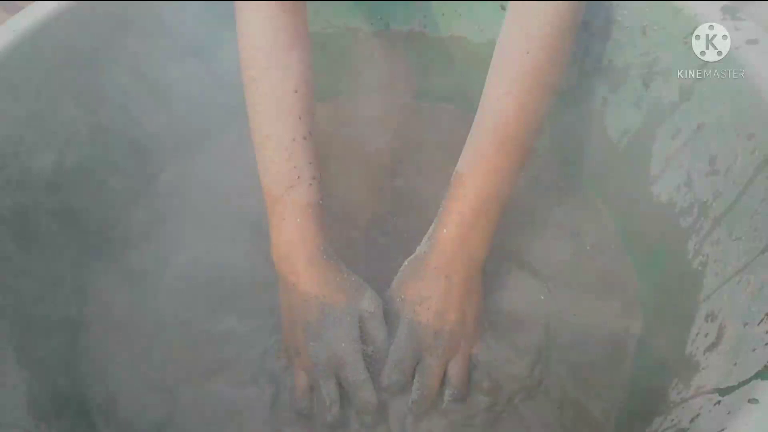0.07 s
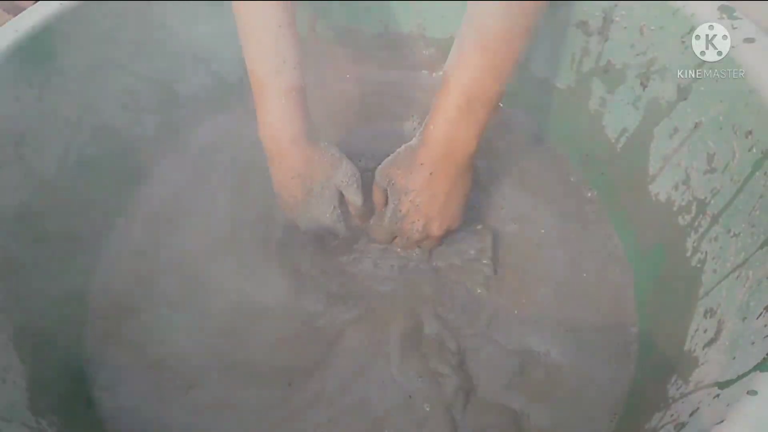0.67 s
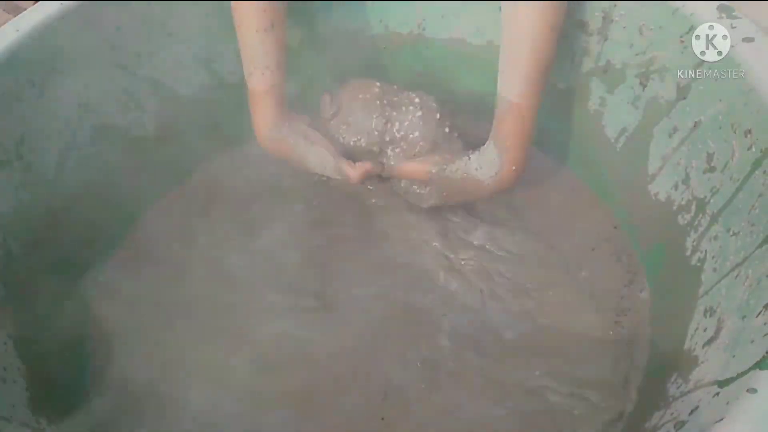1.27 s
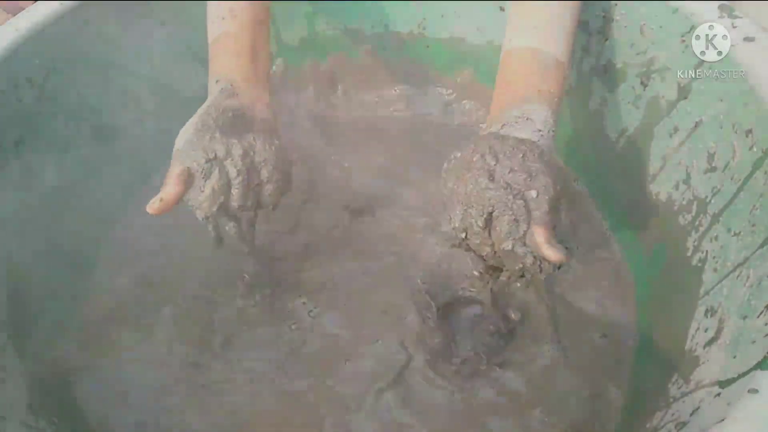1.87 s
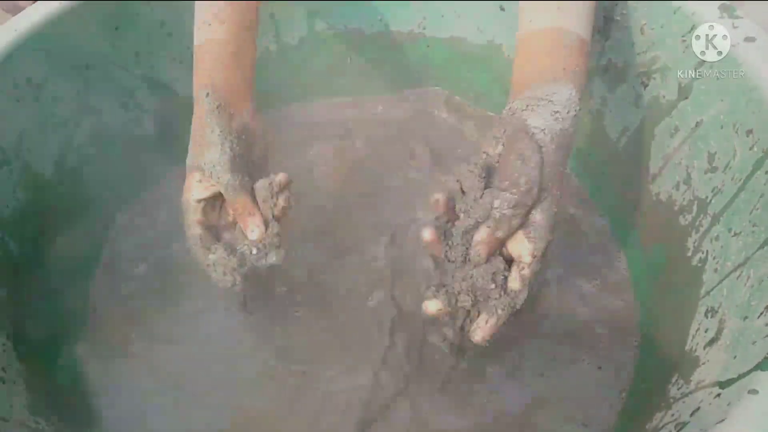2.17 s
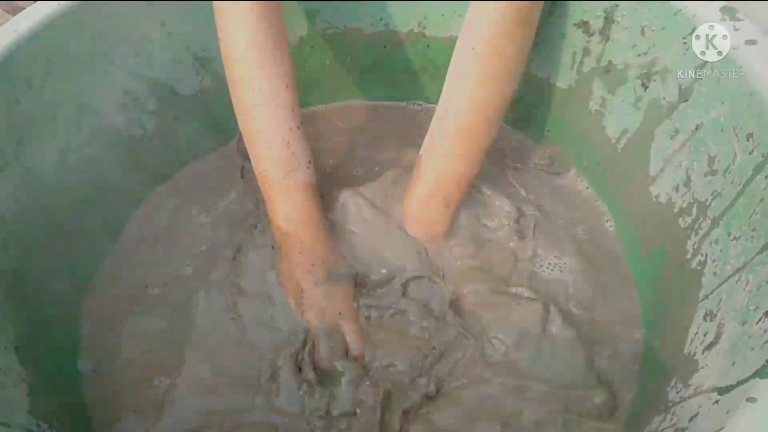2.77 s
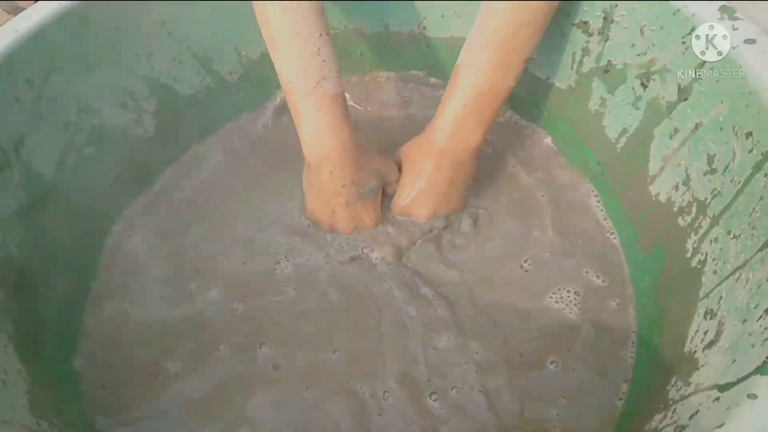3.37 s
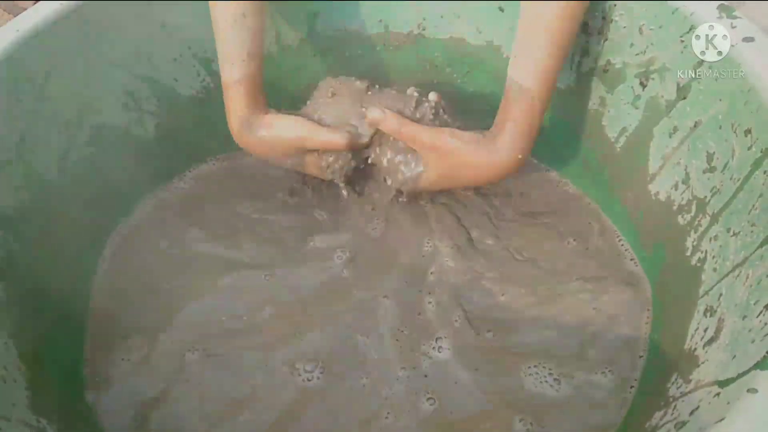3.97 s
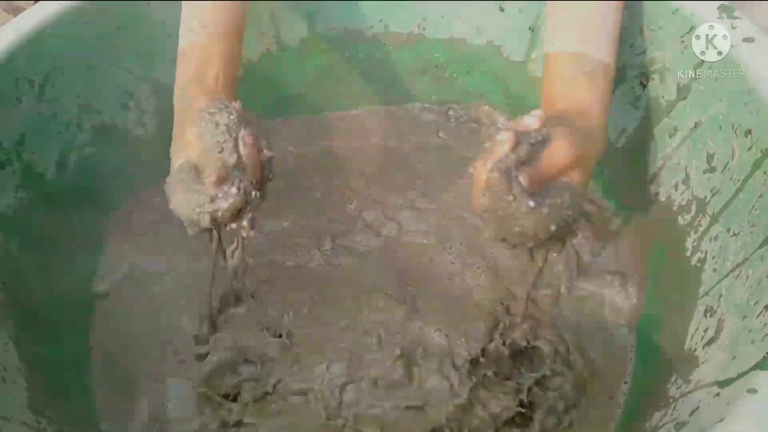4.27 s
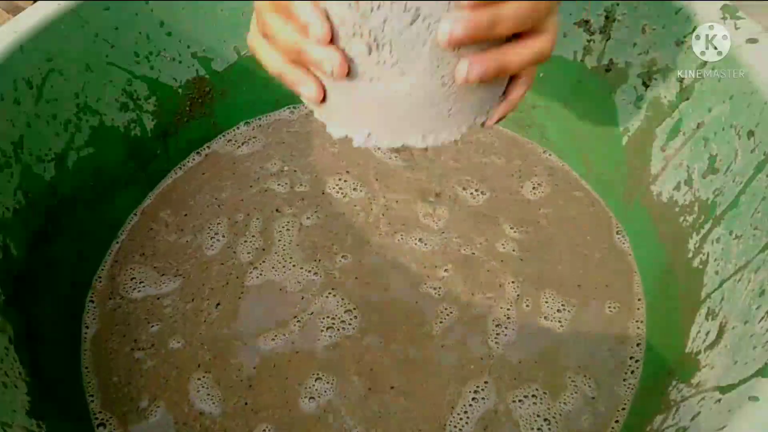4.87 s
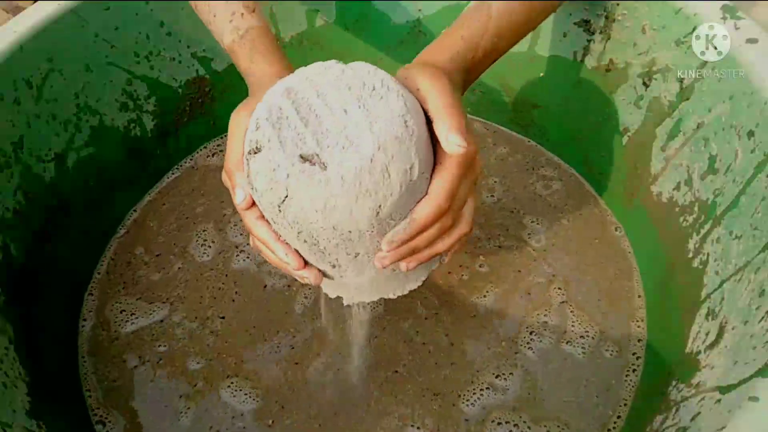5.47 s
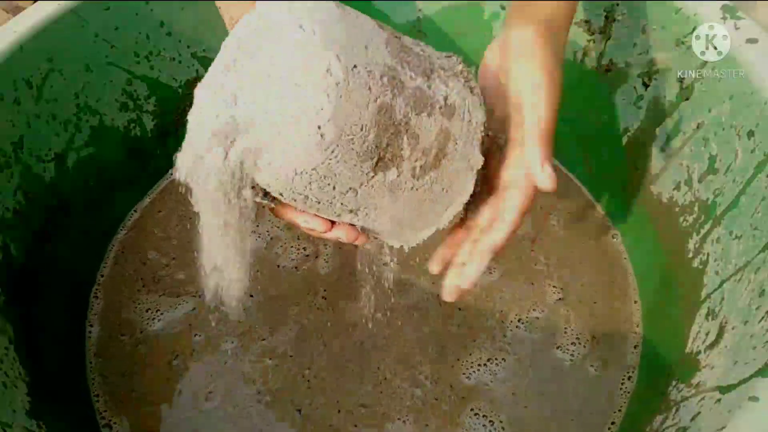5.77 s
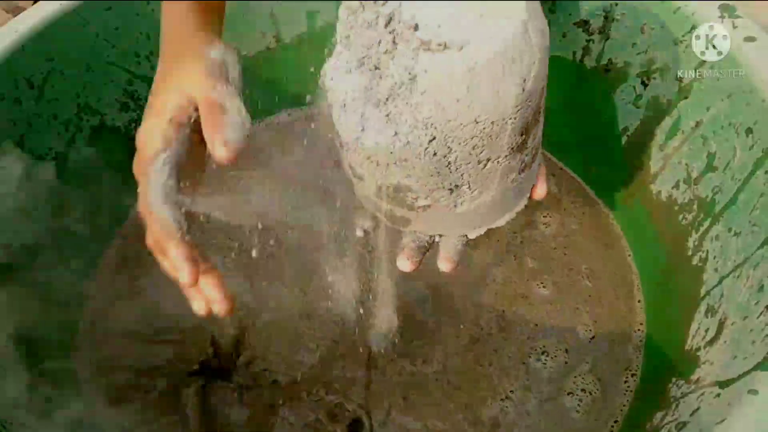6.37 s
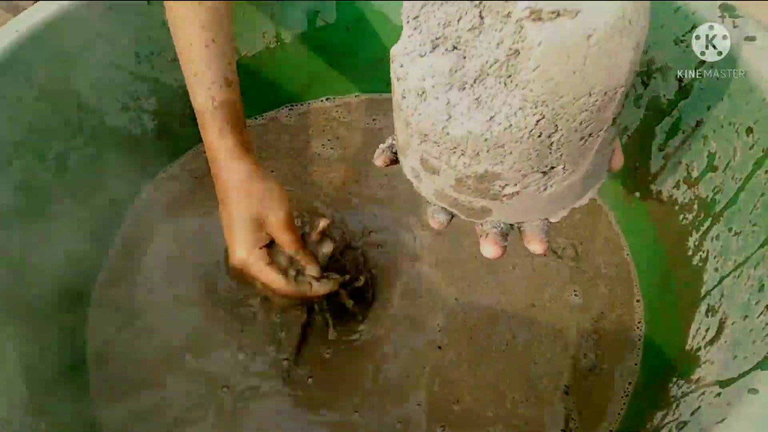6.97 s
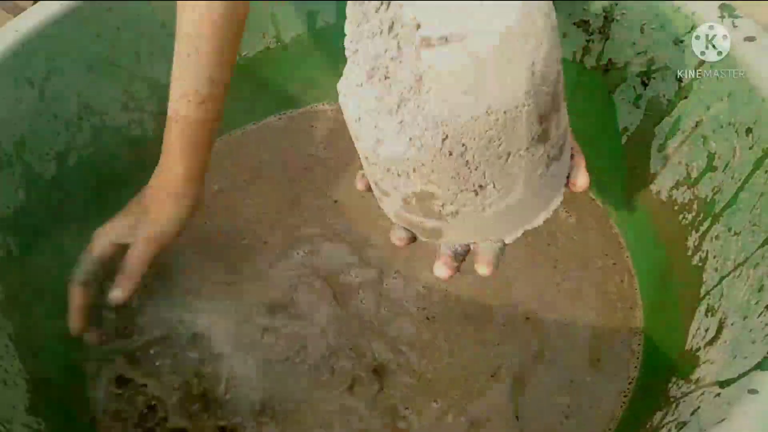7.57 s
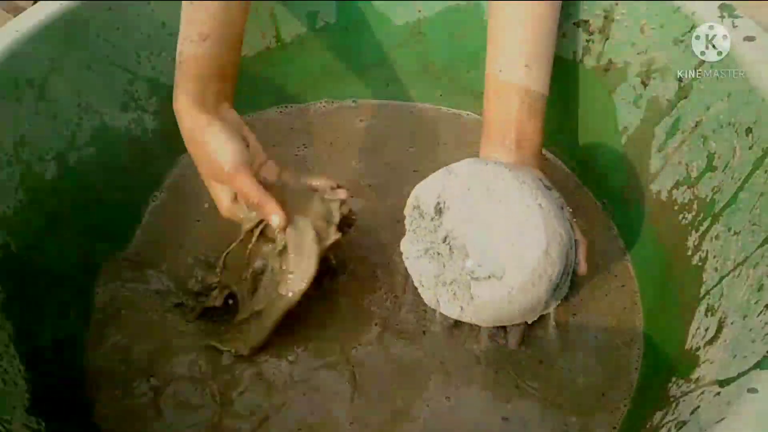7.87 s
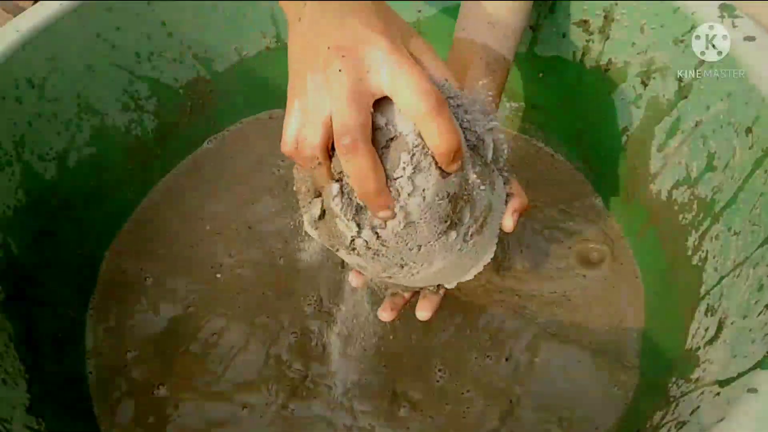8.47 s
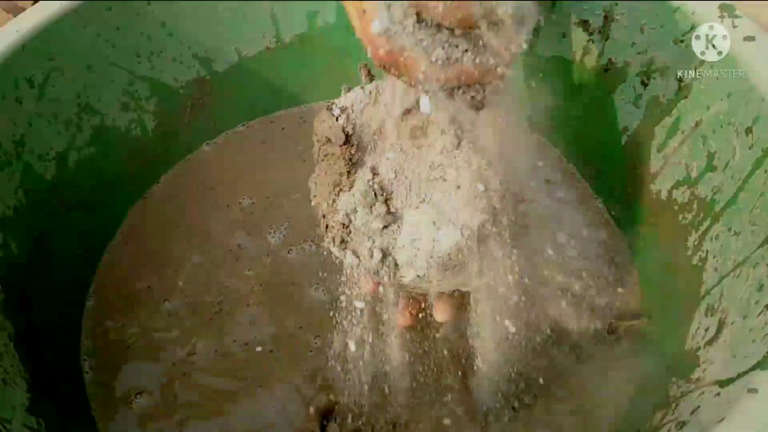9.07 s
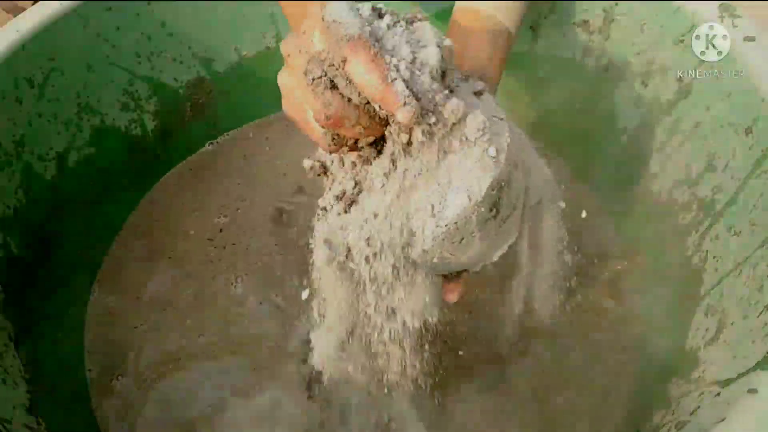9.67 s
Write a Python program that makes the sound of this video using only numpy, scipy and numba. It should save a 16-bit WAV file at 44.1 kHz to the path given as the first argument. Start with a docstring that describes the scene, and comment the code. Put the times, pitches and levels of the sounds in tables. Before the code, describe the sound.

Hands knead and scoop sandy mud in a plastic tub of water. The slurry swirls, fizzes and falls back in wet splats, with plops of trapped air. After a brief lull about halfway, dry sand hisses into the water, a hand splashes lightly, and a sand block is crushed, its grit pattering down. The tub booms softly at times. The microphone is close, with the bright detail mostly on the left.

```python
"""Mud and sand in a plastic tub

Two hands knead and scoop slurry: it swirls, spatters and fizzes with bubbles, falls back in
splats, and trapped air plops. Then a block of dry sand is wetted and crushed; its grit hisses
and patters into the water. Bubbles and grains are damped sines, mixed with shaped noise.
The tub booms softly at times; the close microphone hears the treble mostly on the left."""
import sys
import numpy as np
from scipy import signal
from scipy.fft import rfft, irfft, next_fast_len
from scipy.io import wavfile
from scipy.ndimage import map_coordinates
from numba import njit

SR = 44100
rng = np.random.default_rng(int(sys.argv[2]) if len(sys.argv) > 2 else 0)


def log_audio(samples):
    """Write samples as a 16-bit WAV file to the path given in sys.argv[1]."""
    # one column per channel
    frames = np.atleast_2d(samples).T
    # limit to full scale, then quantise
    limited = np.clip(frames, -1, 1)
    pcm = np.round(limited * 32767).astype(np.int16)
    wavfile.write(sys.argv[1], SR, pcm)


N = 428211


def amp(db):
    """Decibels to gain."""
    return 10 ** (np.asarray(db) / 20)


def unit(x):
    """Scale to rms 1."""
    return x / np.sqrt(np.mean(x ** 2) + 1e-20)


def along(points, hz):
    """Read (freq_hz, value) points on a log axis."""
    freq_hz, values = np.transpose(points)
    return np.interp(np.log(hz + 1), np.log(freq_hz + 1), values)


def stroke(at_s, rise_s, hold_s, fall_s, levels_db, growth_db_per_s=0, fade_db=28):
    """Rise, hold and fall as (time_s, level_db, ...) rows; the hold ends at levels_db."""
    last_db = np.array(levels_db)
    first_db = last_db - growth_db_per_s * hold_s
    return [(at_s - rise_s, *(first_db - fade_db)), (at_s, *first_db),
            (at_s + hold_s, *last_db), (at_s + hold_s + fall_s, *(last_db - fade_db))]


def gains(*curves):
    """Per-sample gain for each dB column; overlapping curves add in power."""
    t = np.arange(0, N / SR, .003)
    each = []
    for rows in curves:
        time_s, *columns_db = np.transpose(rows)
        each.append([amp(np.interp(t, time_s, db, left=-120, right=-120)) for db in columns_db])
    return [np.interp(np.arange(N) / SR, t, gain) for gain in np.linalg.norm(each, axis=0)]


def wobble(knots_per_s):
    """Smooth random curve."""
    knots = rng.standard_normal(int(N * knots_per_s / SR) + 4)
    return map_coordinates(knots, [np.arange(N) * knots_per_s / SR])


def spatter(per_s, fall_s, scatter_db):
    """Envelope of quick random swells, rms 1."""
    jitter, chance = rng.random((int(per_s * N / SR), 2)).T
    at = ((np.arange(len(jitter)) + 2 * jitter) / len(jitter) * N).astype(int) % N
    heights = amp(-scatter_db * np.log(np.maximum(chance, np.exp(-3))))
    poles = np.exp(-1 / (SR * np.array([fall_s, fall_s / 3])))
    return unit(signal.lfilter([1], np.poly(poles), np.bincount(at, heights, N)))


def filtered(x, response):
    """Apply a gain given as a function of Hz."""
    size = next_fast_len(N + SR // 4)
    return irfft(rfft(x, size) * response(np.fft.rfftfreq(size, 1 / SR)), size)[..., :N]


def coloured(x, spectrum):
    """Shape by (freq_hz, gain_db) points, rms 1."""
    return unit(filtered(x, lambda hz: amp(along(spectrum, hz))))


def noise(width):
    """White stereo noise; width is side over mid."""
    mid, side = rng.standard_normal((2, N))
    return unit(np.array([mid + width * side, mid - width * side]))


def swell(peak_s, db, hz, width_oct, rise_s, fall_s):
    """Noise band that grows until peak_s, then fades."""
    t = np.arange(SR) / SR - .5
    octaves = np.log2((np.fft.rfftfreq(SR, 1 / SR) + 1) / hz)
    response = (octaves > -3) / (1 + (octaves / width_oct) ** 2) ** 2
    band = unit(irfft(rfft(rng.standard_normal(SR)) * response, SR))
    envelope = np.exp(-(t / np.where(t < 0, rise_s, fall_s)) ** 2)
    return np.interp(np.arange(N) / SR, peak_s + t, amp(db) * band * envelope, left=0, right=0)


@njit
def ring(starts_s, size, hz, t60_s, rise, attack_cycles, n, sr):
    """Damped sines with a start for each ear; pitch climbs by the fraction rise over t60_s."""
    out = np.zeros((2, n))
    for ear in range(2):
        for g in range(len(size)):
            start_s = starts_s[ear, g]
            for i in range(max(0, int(start_s * sr) + 1), min(n, int((start_s + t60_s[g]) * sr))):
                t = i / sr - start_s
                cycles = hz[g] * t * (1 + rise * t / t60_s[g] / 2)
                onset = 1 - np.exp(-(cycles / attack_cycles) ** 2)
                decay = np.exp(-6.9 * t / t60_s[g])
                out[ear, i] += size[g] * decay * onset * np.sin(2 * np.pi * cycles)
    return out


def bubbles(start_s, size, hz, t60_s, rise, attack_cycles):
    """Ringing grains scattered over the tub, each reaching one ear slightly earlier."""
    start_s, size, hz, t60_s = map(np.ravel, (start_s, size, np.clip(hz, 60, SR / 3), t60_s))
    lag_s = .0001 * rng.standard_normal(len(start_s))
    starts_s = np.array([start_s - lag_s / 2, start_s + lag_s / 2])
    return ring(starts_s, size, hz, t60_s, float(rise), float(attack_cycles), N, SR)


def swarm(per_s, low_hz, high_hz, cycles, scatter_db, rise):
    """Steady stream of grains, many weak and a few strong, rms 1."""
    when, pitch, chance = rng.random((int(per_s * N / SR), 3)).T
    hz = low_hz + (high_hz - low_hz) * pitch
    size = amp(-scatter_db * np.log(np.maximum(chance, np.exp(-4)))) * np.sqrt(hz)
    return unit(bubbles(when * N / SR, size, hz, cycles / hz, rise, attack_cycles=1.8))


def bursts(start_s, db, hz, t60_s, count, spread, cycles, scatter_db, blur_s=0):
    """A fading cluster of tiny bubbles per event; spread is in log pitch, blur_s softens the start."""
    shape = (len(start_s), count)
    age = .6 * ((np.arange(count) + rng.random(shape)) / count) ** 1.3
    detune = np.exp(spread * np.sqrt(3) * rng.uniform(-.973, 1, shape))
    pitch_hz = np.clip(np.reshape(hz, (-1, 1)) * detune, 400, 14000)
    share = amp(scatter_db * rng.standard_normal(shape) - 92 * age ** 2)
    share /= np.linalg.norm(share, axis=1, keepdims=True)
    life_s = cycles / pitch_hz
    starts_s = start_s[:, None] + age * np.reshape(t60_s, (-1, 1)) + blur_s * rng.standard_normal(shape)
    size = amp(db)[:, None] * share / np.sqrt(life_s)  # energy independent of life_s
    return bubbles(starts_s, size, pitch_hz, life_s, rise=.042, attack_cycles=1.415)


def air():
    """Faint, steady noise of the still air."""
    # air spectrum: freq_hz, gain_db
    spectrum = [(30, -13), (110, -2.5), (200, -8), (400, -20), (900, -21.5), (1600, -31), (4000, -35.5),
                (14000, -40.5)]
    return amp(-66.5) * coloured(noise(.66), spectrum)


def stirring():
    """Swirl, splash and spray gains from the hands; submerged drags gather speed."""
    # hands dragging under water: start_s, end_s, final_swirl_db
    drags = [(0.277, 1.115, -41.5), (2.916, 3.844, -35), (6.648, 6.81, -48)]
    # hands breaking the surface, or mud running off them:
    # full_s, rise_s, hold_s, fall_s, swirl_db, splash_db, spray_db
    sloshes = [(0.0, 0.016, 0.081, 0.44, -95.5, -75, -59.5), (0.42, 0.55, 0.057, 0.74, -64, -53, -55.5),
               (0.616, 0.16, 0.094, 0.084, -63, -70, -57.5), (1.062, 0.25, 0.36, 0.16, -53, -47, -52),
               (1.427, 0.16, 0.31, 0.09, -79, -41.5, -46.5), (1.7, 0.2, 0.42, 0.22, -48, -46, -44.5),
               (2.33, 0.47, 0.038, 0.23, -46, -41.5, -42), (2.511, 0.051, 0.021, 0.24, -77, -48, -39),
               (2.586, 0.031, 0.069, 0.069, -70, -37.5, -34),
               (2.651, 0.068, 0.022, 0.23, -35.5, -29.5, -34.5), (2.833, 0.11, 0.028, 0.33, -39, -35, -39),
               (3.272, 0.037, 0.033, 0.57, -44, -48, -52.5), (3.788, 0.3, 0.18, 0.23, -42, -49, -48.5),
               (4.032, 0.2, 0.5, 0.083, -49, -35.5, -39), (4.533, 0.38, 0.34, 0.064, -38, -39, -39.5),
               (4.925, 0.11, 0.16, 0.13, -77.5, -66, -66), (6.478, 0.088, 0.25, 0.38, -64, -55.5, -53),
               (6.987, 0.041, 0.24, 0.19, -69.5, -58, -54.5), (7.268, 0.05, 0.11, 0.24, -56, -58.5, -55),
               (7.675, 0.11, 0.022, 0.12, -41, -38.5, -37), (7.884, 0.11, 0.024, 0.079, -42, -30.5, -41),
               (7.923, 0.47, 0.23, 0.08, -72, -55.5, -48.5), (8.202, 0.077, 0.026, 0.45, -86.5, -77, -54)]
    curves = []
    for start_s, end_s, db in drags:
        levels_db = (db, db - 6, db - 19.5)  # the surface stays almost closed
        curves.append(stroke(start_s, .18, end_s - start_s, .083, levels_db, growth_db_per_s=17))
    for full_s, rise_s, hold_s, fall_s, *levels_db in sloshes:
        curves.append(stroke(full_s, rise_s, hold_s, fall_s, levels_db))
    return gains(*curves)


def slurry(swirl, splash, spray):
    """Submerged hands churn smoothly; an open surface adds spatters and a fizz of bursting films."""
    # spectra of churning, splashing, spray and a barely moving film: freq_hz, gain_db
    gurgle_eq = [(100, -38), (250, -26), (360, -17.5), (430, -3.5), (490, 1.5), (560, 1), (640, -8),
                 (900, -9.5), (1600, -45.5), (5000, -87)]
    splash_eq = [(350, -35), (650, -3.5), (1000, 8), (1500, 9), (2200, -3.5), (3200, -2), (6000, -28.5),
                 (10000, -61.5)]
    spray_eq = [(1180, -28), (2000, 2), (2600, -1), (3810, -1.5), (5880, 1), (8050, -8.5), (13700, -9),
                (14500, -16.5), (15100, -38.5), (16000, -44)]
    seep_eq = [(1000, -21.5), (2000, -12.5), (3100, -15), (4400, -4.5), (5800, 0.5), (7500, -4.5),
               (13700, -19.5), (15100, -38)]
    open_db, seep_db, quiet_db, muffle_hz = -58.5, -56, -74, 7200
    clumps = np.minimum(wobble(75), 1) + .15  # ragged flow: more gaps than leaps
    opened = spray ** 2 / (spray ** 2 + amp(open_db) ** 2)
    smooth = np.sqrt(1 - .15 * opened ** 2)
    flecks = unit(.43 + spatter(per_s=150, fall_s=.003, scatter_db=1.6))
    spatters = 1 + opened ** 2 * (flecks - 1)

    churn = swarm(900, 150, 1130, cycles=17, scatter_db=2.2, rise=.07) + .9 * noise(.15)
    gurgling = swirl * coloured(churn, gurgle_eq)

    drops = coloured(swarm(330, 471, 4070, cycles=18, scatter_db=2.4, rise=.04), splash_eq)
    drips = swarm(85, 850, 2700, cycles=29, scatter_db=2, rise=.06)
    films = coloured(swarm(900, 1800, 11460, cycles=35, scatter_db=1.5, rise=.067), spray_eq)
    wash = coloured(noise(.65), splash_eq)
    water = opened * (.75 * drops + amp(-4.5) * drips) + .85 * smooth * wash
    splashing = splash * water * amp(2.4 * opened * clumps)

    specks = swarm(100, 2000, 6500, cycles=42, scatter_db=3, rise=.1)
    fizz = opened * films + smooth * (.95 * coloured(noise(.93), spray_eq) + .62 * specks)
    # weak spray thins to a fine, high seeping
    seep = amp(.5) * coloured(noise(.93) + specks / 2, seep_eq)
    thin = amp(seep_db) ** 2 / (spray ** 2 + amp(seep_db) ** 2)
    fizz = np.sqrt(1 - thin) * fizz + np.sqrt(thin) * seep
    # deep swirl muffles the fizz, and so does a very faint spray
    dull = filtered(fizz, lambda hz: 1 / (1 + (hz / muffle_hz) ** 8))
    exposed = spray ** 2 / (spray ** 2 + (amp(-8) * swirl) ** 2 + amp(quiet_db) ** 2)
    fizz = dull + exposed * (fizz - dull)
    fizzing = spray * fizz * amp(3.5 + (.65 + 1.5 * opened) * clumps)
    return gurgling + spatters * (splashing + fizzing)


def splats():
    """A lump of mud clicks on contact, slaps the surface and throws a bright spray."""
    # mud landing and tearing: start_s, spray_db, slap_db, spray_hz
    lumps = [(.01, -40.5, -74.5, 2540), (.418, -44, -55, 3870), (.634, -42.5, -48, 5550),
             (.945, -33.5, -41.5, 4860), (.991, -33, -30.5, 4460), (1.11, -37.5, -43, 2370),
             (1.139, -36, -33, 5300), (1.243, -37, -42.5, 3400), (1.293, -29, -33.5, 1610),
             (1.311, -32.5, -44.5, 5800), (1.419, -39, -37.5, 2020), (1.452, -34, -34, 2470),
             (1.584, -34, -36, 3500), (1.599, -34.5, -44, 2760), (1.618, -33, -35, 2470),
             (1.655, -29, -45, 5740), (1.679, -30.5, -44.5, 5660), (1.724, -28, -36, 3800),
             (1.734, -30.5, -31.5, 4120), (1.758, -35, -42, 2200), (1.85, -20, -24.5, 2380),
             (1.877, -20.5, -33, 5800), (1.905, -23.5, -25, 4220), (1.924, -27.5, -29.5, 2570),
             (1.953, -23, -35.5, 4970), (1.973, -30, -33.5, 2030), (2.043, -31.5, -37, 2080),
             (2.055, -25.5, -20, 5100), (2.083, -27.5, -40.5, 2600), (2.122, -47, -34.5, 5430),
             (2.158, -21.5, -44.5, 4220), (2.2, -23.5, -25.5, 2150), (2.3, -31, -33.5, 2950),
             (2.308, -27, -35.5, 6040), (2.347, -30, -39.5, 2730), (2.371, -20.5, -29.5, 2770),
             (2.391, -27.5, -34.5, 5900), (2.406, -27.5, -34, 6300), (2.502, -33, -36, 4630),
             (2.519, -31.5, -45, 3860), (2.551, -28, -47, 4200), (2.574, -24.5, -42, 4800),
             (2.595, -28.5, -31.5, 2250), (2.629, -23.5, -26, 6040), (2.653, -25.5, -21, 2530),
             (2.683, -34, -27.5, 3720), (2.691, -15, -21, 5730), (2.741, -30, -26, 1700),
             (2.838, -40, -20, 1890), (2.852, -32, -27.5, 1800), (2.87, -26.5, -23.5, 5500),
             (3.086, -35.5, -55, 5900), (3.279, -31.5, -38, 4600), (3.288, -38.5, -40.5, 5840),
             (3.648, -42, -35.5, 4630), (3.808, -29, -27.5, 4370), (3.852, -50, -29, 1810),
             (3.886, -35, -47, 5130), (3.967, -25, -47.5, 4000), (4.02, -20.5, -29.5, 5740),
             (4.082, -19, -21.5, 5400), (4.256, -29, -29, 2000), (4.315, -23.5, -34, 2770),
             (4.355, -29, -40, 5170), (4.446, -26.5, -25.5, 3360), (4.397, -26.5, -28, 2100),
             (4.485, -22, -26, 2850), (4.517, -22.5, -32.5, 3250), (4.547, -18, -18.5, 5640),
             (4.574, -35.5, -34, 4020), (4.598, -21.5, -23, 5670), (4.632, -28, -34.5, 4640),
             (4.704, -22.5, -37, 3560), (4.727, -23, -34.5, 5400), (4.793, -24, -25.5, 5100),
             (4.846, -40, -25, 5560), (4.886, -39.5, -36, 1920), (4.907, -37, -50.5, 5970),
             (5.005, -43, -41.5, 5730), (5.913, -46.5, -60.5, 2334), (6.054, -31, -42, 5000),
             (6.07, -38, -44, 1940), (6.174, -35.5, -47, 2440), (6.223, -33, -41.5, 5600),
             (6.457, -45, -52, 2250), (6.508, -47, -41, 6300), (6.543, -46, -49, 2500),
             (6.713, -39, -35, 5140), (6.997, -34, -40, 2220), (7.02, -44, -38, 2300),
             (7.098, -35, -52, 5950), (7.193, -34, -43, 1910), (7.23, -38, -52, 2500),
             (7.277, -36, -35, 2270), (7.332, -38.5, -48.5, 4570), (7.52, -42.5, -66.5, 5970),
             (7.602, -36, -52, 6900), (7.628, -30, -57, 5200), (7.662, -27, -29, 2920),
             (7.7, -35, -40, 4870), (7.772, -24.5, -29, 4770), (7.857, -31, -33, 1700),
             (7.889, -38, -22, 2020), (7.976, -37, -43, 8200), (7.999, -30, -48.5, 3020),
             (8.038, -36, -48.5, 4740), (8.257, -46, -57.5, 2070), (8.764, -44, -63.5, 2740),
             (8.792, -42, -42.5, 1900), (8.812, -28.5, -31, 2140), (9.16, -36, -35, 2180),
             (9.273, -39.5, -29, 1810), (9.339, -39, -31.5, 1900), (9.381, -33.5, -26.5, 5940),
             (9.398, -42, -33, 6260), (9.415, -35, -37, 6360), (9.539, -35.5, -32, 5500),
             (9.571, -29.5, -28.5, 6060), (9.601, -45, -35.5, 4440), (9.618, -33.5, -32, 5000),
             (9.678, -29.5, -27.5, 4500)]
    start_s, spray_db, slap_db, spray_hz = np.transpose(lumps)
    t60_s = .032 * 2 ** ((slap_db + 32.5) / 46)  # a harder slap sprays longer
    blur_s = .001  # a soft lump does not land all at once
    spray = bursts(start_s, spray_db - 4.5, spray_hz, t60_s,
                   count=7, spread=.12, cycles=35, scatter_db=3.5, blur_s=blur_s)
    crackle = bursts(start_s, spray_db, 4800, t60_s,
                     count=70, spread=.5, cycles=6.94, scatter_db=5, blur_s=blur_s)
    slap = bursts(start_s, slap_db - 1.5, 1100, t60_s, count=14, spread=.385, cycles=9.94, scatter_db=1)
    click_hz = np.sqrt(2600 * spray_hz)
    click = bubbles(start_s, amp(spray_db + 13), click_hz, 8 / click_hz, rise=0, attack_cycles=.8)
    return click + spray + crackle + slap


def plops():
    """Air pockets ring and split; the film over each tears with a ragged squelch."""
    # trapped air: start_s, level_db, pitch_hz, t60_s
    pockets = [(0.124, -46, 996, 0.073), (0.228, -43, 980, 0.078), (0.309, -24, 1550, 0.017),
               (0.367, -28, 1320, 0.021), (0.85, -31.5, 1660, 0.015), (1.081, -18.5, 2120, 0.014),
               (1.094, -19.5, 587, 0.03), (1.167, -25, 1080, 0.026), (1.286, -14.5, 1130, 0.016),
               (1.318, -22, 430, 0.029), (1.35, -16.5, 5150, 0.01), (1.369, -19, 1360, 0.021),
               (1.389, -20, 1900, 0.018), (1.536, -17, 1020, 0.056), (1.706, -13.5, 940, 0.013),
               (1.732, -24, 1250, 0.036), (1.851, -13, 2520, 0.022), (1.949, -25, 502, 0.11),
               (2.014, -21, 1290, 0.018), (2.028, -25, 1900, 0.017), (2.056, -12.5, 489, 0.053),
               (2.095, -9, 350, 0.033), (2.202, -9.5, 1030, 0.015), (2.214, -20, 510, 0.036),
               (2.37, -20, 2470, .016), (2.595, -11.5, 1910, 0.016), (2.667, -9.5, 617, 0.029),
               (2.69, -8, 2030, 0.016), (2.695, -18.5, 470, .05), (2.741, -9, 1150, .009),
               (2.827, -6, 840, 0.012), (2.852, -20.5, 557, 0.06), (3.93, -20.5, 1190, .04),
               (4.006, -20, 1750, 0.015), (4.021, -8, 594, 0.018), (4.04, -15, 475, 0.033),
               (4.067, -8.5, 457, 0.064), (4.274, -19, 1610, 0.016), (4.318, -9, 590, 0.026),
               (4.373, -11.5, 860, 0.015), (4.487, -9.5, 1950, 0.012), (4.518, -15.5, 620, 0.032),
               (4.542, -16, 1350, 0.038), (4.567, -17, 490, 0.029), (4.603, -15.5, 960, 0.023),
               (4.655, -12.5, 342, 0.064), (4.752, -19, 1420, 0.015), (6.009, -22.5, 1240, 0.018),
               (6.102, -20.5, 1120, 0.022), (6.421, -46, 2300, 0.022), (6.487, -27.5, 1290, 0.019),
               (6.536, -25.5, 1210, .019), (6.595, -23.5, 624, 0.043), (6.646, -30, 668, .03),
               (6.724, -31, 824, 0.057), (6.917, -28.5, 1307, 0.028), (6.983, -26.5, 1440, 0.02),
               (7.1, -26, 1320, .02), (7.198, -47, 380, 0.12), (7.237, -28.5, 594, .033),
               (7.349, -15, 733, 0.024), (7.715, -15.5, 1230, 0.014), (7.773, -20, 1640, 0.021),
               (7.897, -14, 1430, 0.014), (7.987, -27, 1750, 0.019), (8.099, -29, 1374, .02),
               (8.815, -24.5, 722, 0.053), (8.886, -21.5, 644, 0.02), (8.941, -23, 653, 0.017),
               (9.114, -36, 1590, 0.02), (9.152, -17, 563, 0.046), (9.192, -6, 684, .011),
               (9.364, -19.5, 726, 0.033), (9.571, -16, 606, 0.015)]
    start_s, db, hz, t60_s = np.transpose(pockets)
    tear_s = np.minimum(t60_s, .03)
    ringing = bubbles(start_s, amp(db + 3), hz, t60_s, rise=.025, attack_cycles=1.7)
    pieces = bursts(start_s + .002, db - 18.5, 1.1 * hz, tear_s,
                    count=9, spread=.28, cycles=12, scatter_db=2)
    squelch = bursts(start_s, db - 19, 55 * np.sqrt(hz), tear_s,
                     count=30, spread=.6, cycles=4.7, scatter_db=7)
    return ringing + pieces + squelch


def ticks():
    """Hard contacts a few cycles long, with specks flying off."""
    # single drops and crumbs striking: start_s, level_db, pitch_hz
    strikes = [(0.177, -32, 3900), (0.257, -30, 4500), (0.33, -29, 5900), (0.452, -24, 4360),
               (0.469, -19.5, 5900), (0.531, -28, 5000), (0.614, -22, 5700), (1.047, -16, 6200),
               (1.389, -9.5, 5140), (1.818, -7, 5730), (2.678, -5, 7250), (2.826, -20, 2600),
               (3.281, -14, 4170), (2.955, -19, 6260), (3.695, -11, 6200), (3.92, -13.5, 2290),
               (6.86, -24.5, 4705), (7.143, -21, 6800), (7.288, -13, 5930), (7.721, -9, 5640),
               (8.814, -13.5, 4040), (9.193, -14.5, 5660), (9.3015, -3, 7000)]
    start_s, db, hz = np.transpose(strikes)
    specks = bursts(start_s, db - 22, hz, t60_s=.012, count=12, spread=.25, cycles=12, scatter_db=3)
    contact = bubbles(start_s, amp(db + 7), hz, 10 / hz, rise=0, attack_cycles=1.3)
    return contact + specks


def tub_boom():
    """The tub booms in soft swells over a faint, steady rumble."""
    # swells of booming: full_s, rise_s, hold_s, level_db
    booms = [(0.905, 0.35, 0.1, -39.5), (3.842, 0.07, 0.012, -42.5), (5.245, 0.26, 0.16, -34.5),
             (6.33, 0.15, 0.057, -47.5), (7.127, 0.34, 0.11, -57.5), (7.788, 0.12, 0.21, -56),
             (8.546, 0.1, 0.15, -37.5), (8.837, 0.17, 0.17, -48.5), (9.576, 0.31, 0.18, -35)]
    # tub spectrum: freq_hz, gain_db
    spectrum = [(25, -51), (45, -31), (61, -0.5), (78, -23.5), (100, 3), (123, 2.5), (155, -4.5),
                (205, -23), (300, -30.5), (600, -67.5)]
    fall_s, rest_db = .17, -62
    swells, = gains(*[stroke(full_s, rise_s, hold_s, fall_s, [db])
                      for full_s, rise_s, hold_s, db in booms])
    return amp(-3.5) * (swells + amp(rest_db)) * coloured(noise(.17), spectrum)


def gulps():
    """A cloud of large bubbles throbs as water rushes into the hole left by the hands."""
    # bubble clouds: peak_s, level_db, pitch_hz, rise_s, fall_s
    clouds = [(0.899, -50, 245, 0.054, 0.21), (2.078, -34.5, 384, 0.027, 0.11),
              (2.698, -33.5, 452, 0.0061, 0.016), (3.682, -39, 383, 0.044, 0.08),
              (3.818, -32, 360, 0.044, 0.048), (4.03, -25, 522, 0.012, 0.021),
              (4.08, -27, 464, 0.022, 0.019), (4.181, -49.5, 261, 0.56, 0.062),
              (4.558, -37, 482, 0.11, 0.025), (4.681, -45.5, 322, 0.026, 0.12),
              (4.79, -38.5, 203.7, 0.098, 0.095)]
    width_oct = .72
    return sum(swell(peak_s, db, hz, width_oct, rise_s, fall_s)
               for peak_s, db, hz, rise_s, fall_s in clouds)


def thud():
    """The plunging hands hit the packed sand below: one short, deep push."""
    start_s, length_s = 2.692, .00054
    age = np.maximum(np.arange(N) / SR - start_s, 0) / length_s
    return amp(-20.5) * age * (2 - age) * np.exp(-age)


def faint_tones():
    """Wavering tones in the lulls: a narrow core of noise with a rough skirt."""
    # tones: peak_s, level_db, pitch_hz, half_length_s
    tones = [(5.08, -58, 737, 0.11), (5.119, -57, 1015, 0.093), (5.12, -52.5, 1310, 0.12),
             (5.357, -60, 798, 0.12), (5.406, -64, 1347, 0.045), (5.694, -71.5, 1267, 0.082),
             (5.795, -61.5, 854, 0.1), (5.832, -55.5, 279.5, 0.15), (8.071, -51, 423, 0.091),
             (8.09, -49.5, 637, 0.045), (8.284, -57, 645, 0.052), (8.637, -56, 1114, 0.046)]
    sound = np.zeros(N)
    for peak_s, db, hz, half_s in tones:
        core = swell(peak_s, db - 5.5, hz, 60 / hz, half_s, half_s)
        skirt = swell(peak_s, db - 3, hz, .16, half_s, half_s)
        sound += core + skirt
    return sound


def sand():
    """Dry grit hisses off the block and patters into the water; larger crumbs tick and plip."""
    # one level curve per pour: time_s, patter_db, grit_db
    pours = [
        [(5.86, -72, -80), (6.006, -59, -45), (6.246, -43.5, -44), (6.42, -76, -66)],
        [(8.44, -96, -52), (8.53, -76, -49), (8.628, -102, -49.5), (8.86, -38.5, -38), (8.976, -45, -40.5),
         (9.242, -41, -42.5), (9.344, -43, -39.5), (9.516, -38.5, -37), (9.72, -48, -43.5)],
    ]
    # spectra of patter on water and of sliding grit: freq_hz, gain_db
    patter_eq = [(180, -60), (300, -42.5), (427, -22), (540, -3.5), (879, -9), (1210, -2), (1540, -13),
                 (1950, -6.5), (2600, -28.5), (3380, -48.5), (5720, -120)]
    grit_eq = [(1180, -21), (2000, -6), (2160, -4.5), (2760, -3), (3280, -4), (6200, -1), (9490, -12.5),
               (13700, -10.5), (14700, -21), (16000, -76)]
    patter, grit = gains(*pours)
    clumps = (wobble(45) + wobble(170)) / np.sqrt(2)
    crumbs = spatter(per_s=60, fall_s=.0014, scatter_db=2.5)
    drops = swarm(1000, 380, 2600, cycles=9, scatter_db=2.4, rise=.06) + .6 * noise(.45)
    grains = swarm(3500, 1800, 13440, cycles=8, scatter_db=2.8, rise=0) + .8 * noise(.8)
    landing = patter * coloured(drops, patter_eq) * (amp(3 * clumps) + amp(-12) * crumbs)
    sliding = grit * coloured(grains, grit_eq) * (amp(2 * clumps) + amp(-5.5) * crumbs)
    return amp(.75) * landing + amp(-1.24) * sliding


def walls(x, t60_s, wet_db):
    """Add short, dense reflections from the tub's walls."""
    t = np.arange(SR // 5) / SR
    tail = rng.standard_normal((2, len(t))) * amp(-60 * t / t60_s) * (t > .002)
    tail /= np.linalg.norm(tail, axis=1, keepdims=True)
    return x + amp(wet_db) * signal.fftconvolve(x, tail, axes=1)[:, :N]


def scene():
    """Mud and sand between the tub's walls, plus the low and faint layers."""
    contents = slurry(*stirring()) + splats() + sand() + plops() + ticks()
    reflected = walls(contents, t60_s=.055, wet_db=-8.5)
    return reflected + thud() + gulps() + tub_boom() + faint_tones() + air()


def record(dry):
    """Band-limited stereo microphone, its right port shaded in the treble."""
    # channel balance: freq_hz, left_minus_right_db
    balance = [(200, 1), (700, 1.5), (1300, 1.5), (2400, 2), (4400, 12.5), (8000, 14.5), (15000, 12)]
    top_hz = 14500

    def ports(hz):
        ratio = amp(along(balance, hz))
        low_pass = 1 / np.sqrt(1 + (hz / top_hz) ** 120)
        return 2 * np.array([ratio, np.ones_like(ratio)]) / (1 + ratio) * low_pass
    return filtered(dry, ports)


dry = scene()
out = record(dry)
log_audio(out)
```